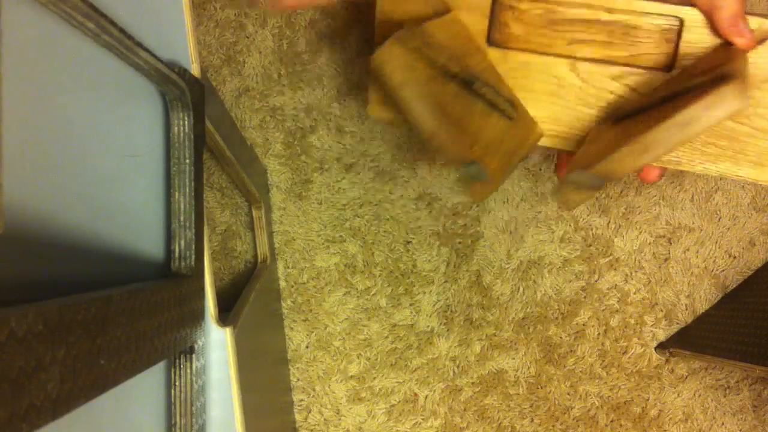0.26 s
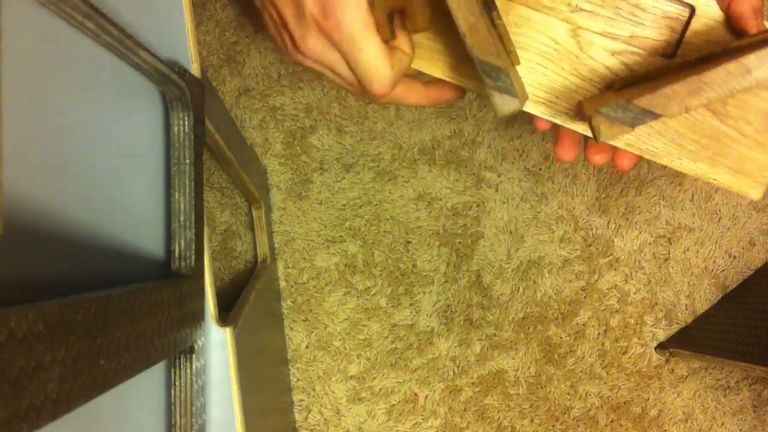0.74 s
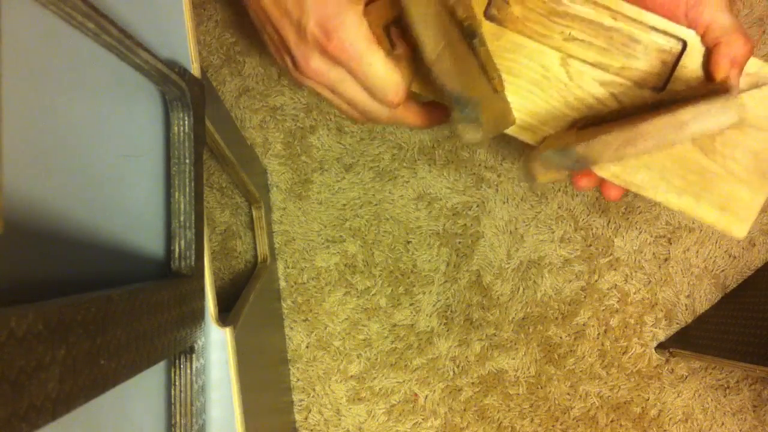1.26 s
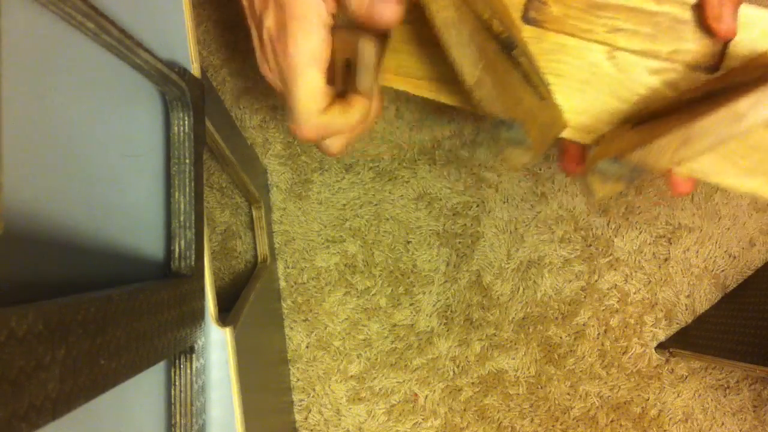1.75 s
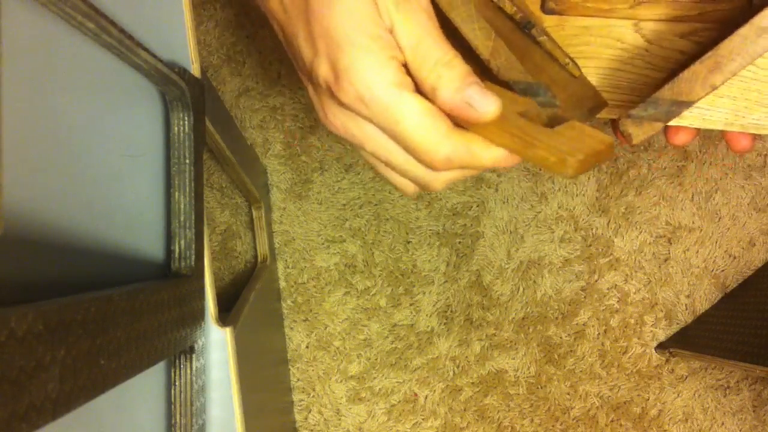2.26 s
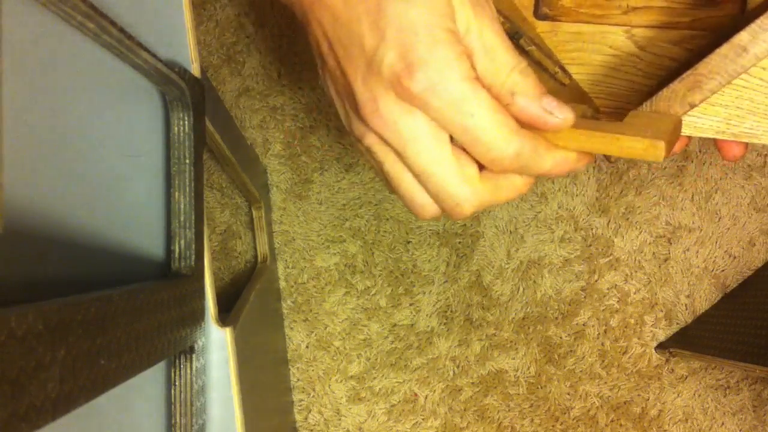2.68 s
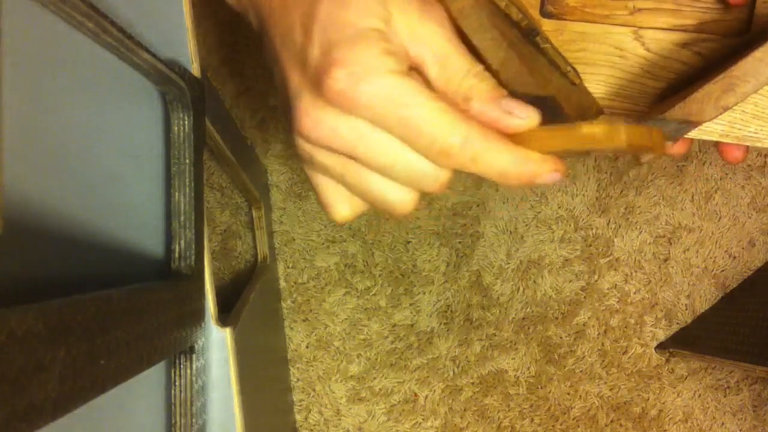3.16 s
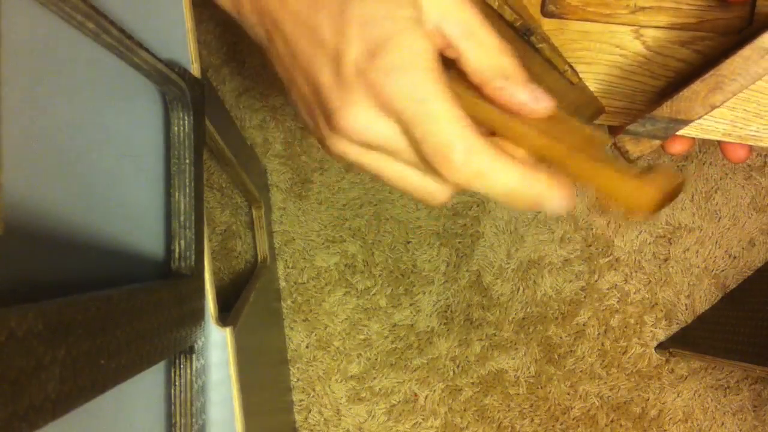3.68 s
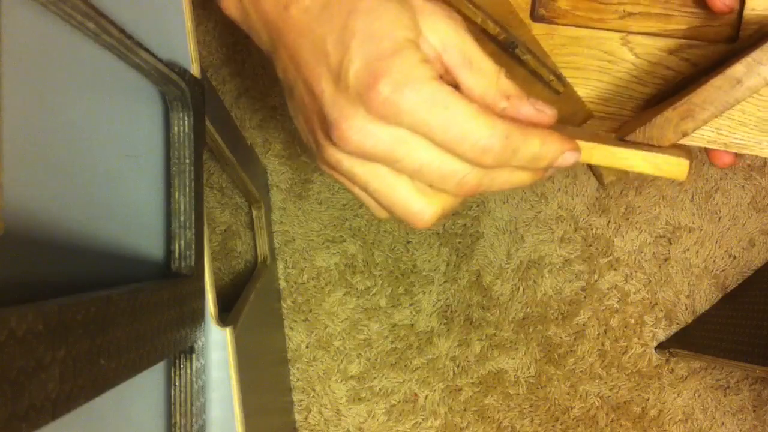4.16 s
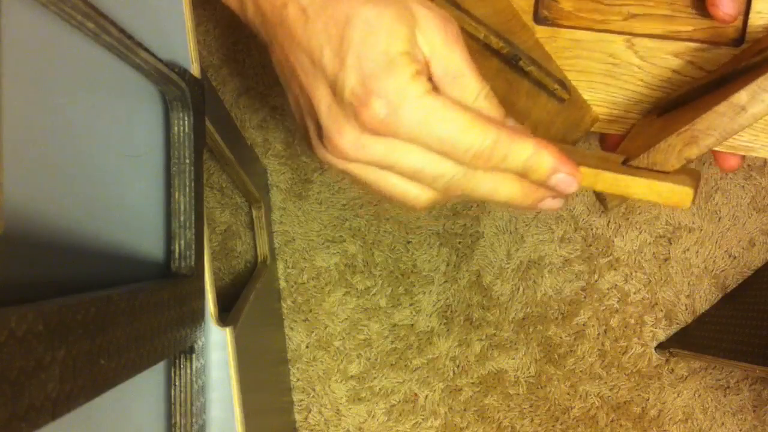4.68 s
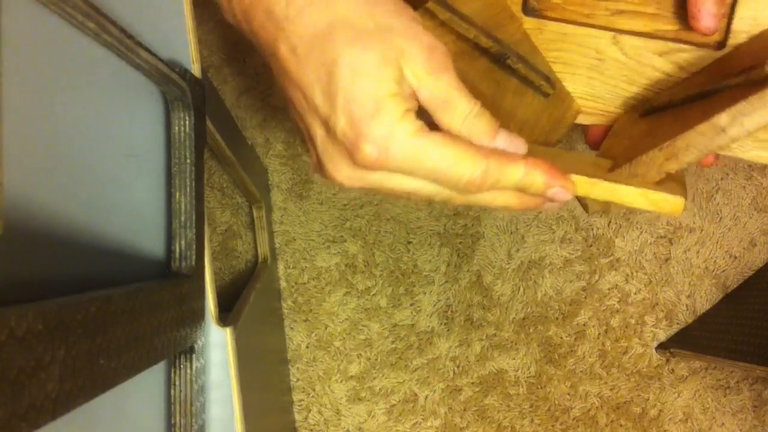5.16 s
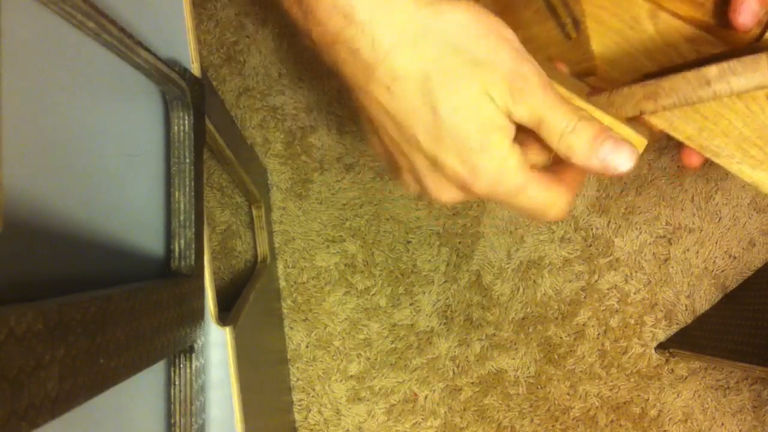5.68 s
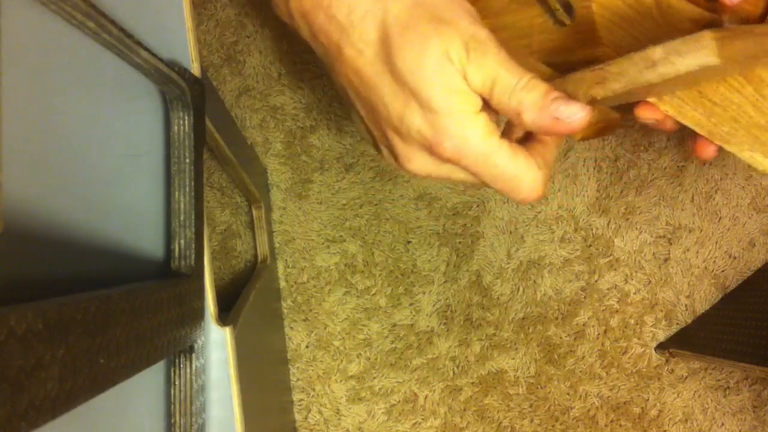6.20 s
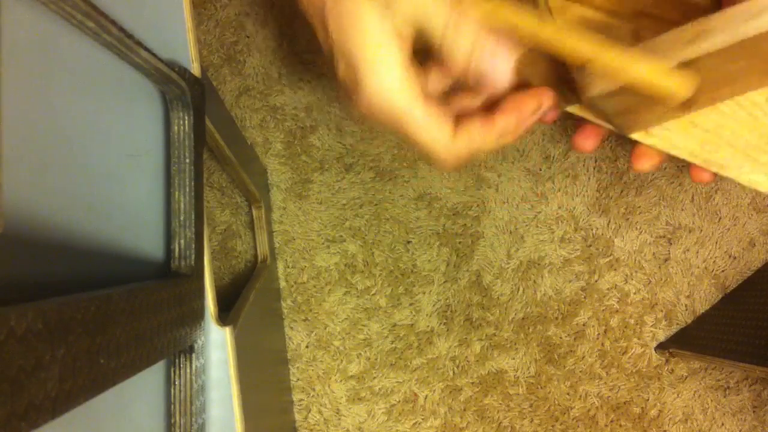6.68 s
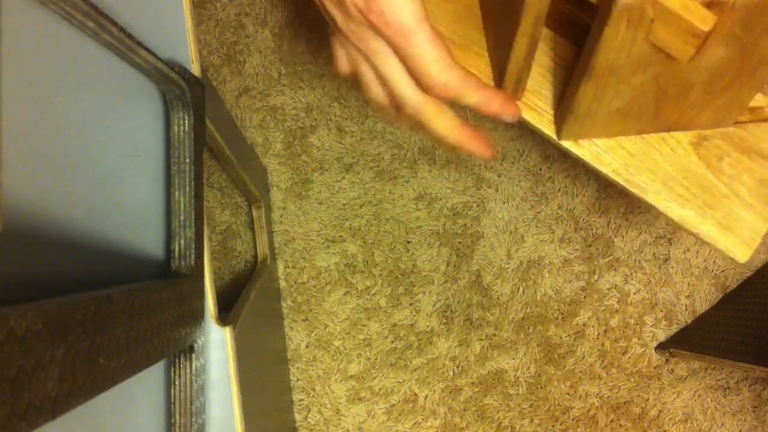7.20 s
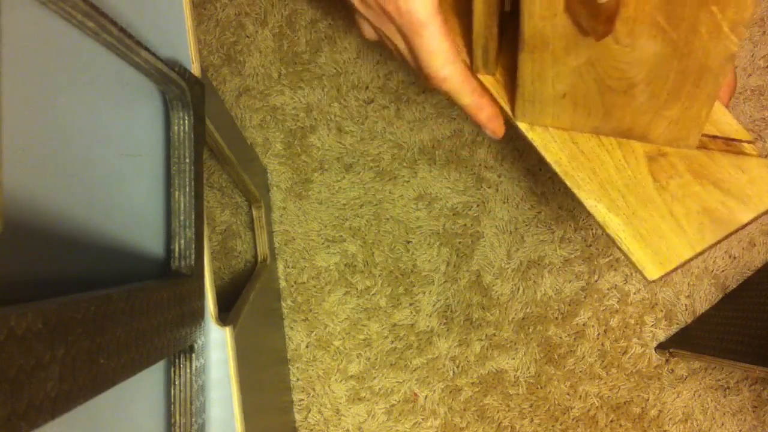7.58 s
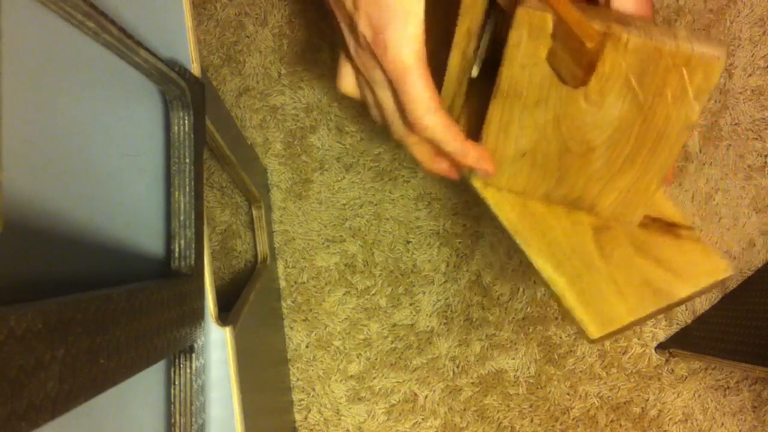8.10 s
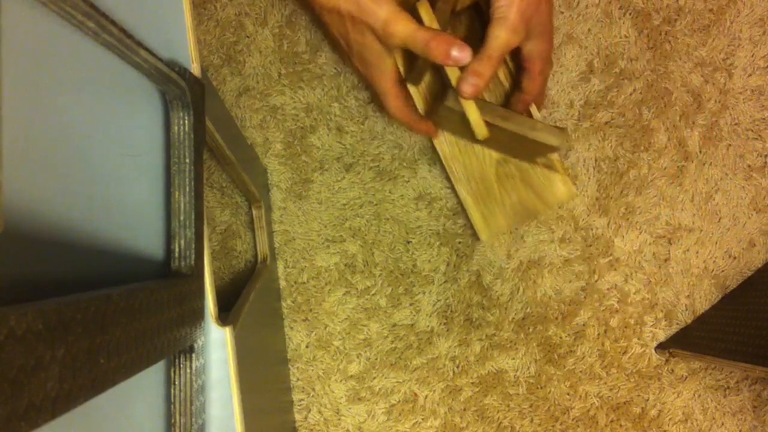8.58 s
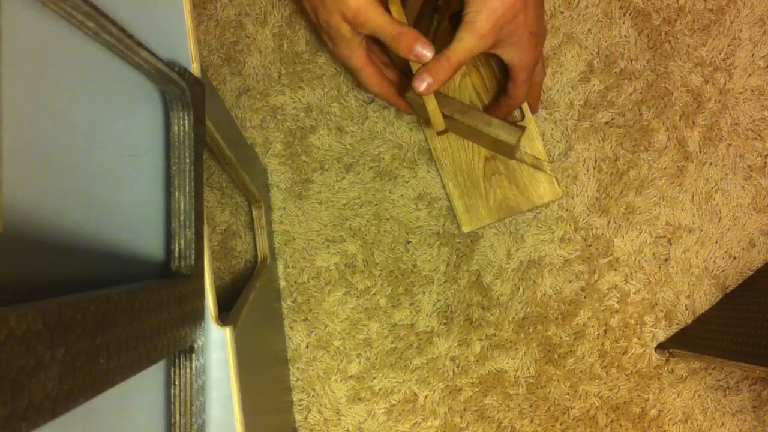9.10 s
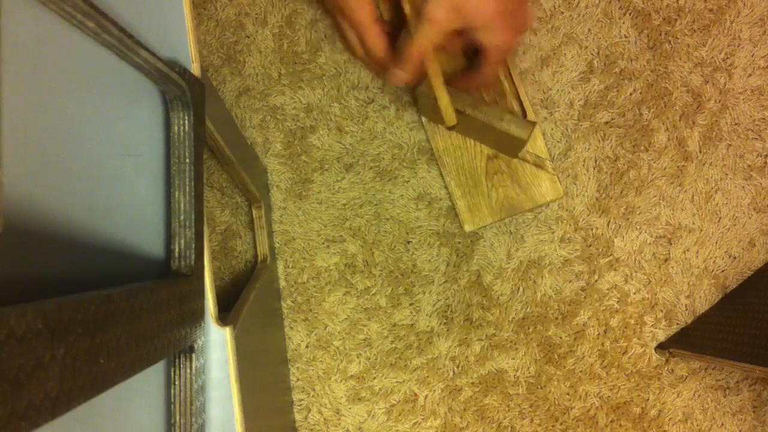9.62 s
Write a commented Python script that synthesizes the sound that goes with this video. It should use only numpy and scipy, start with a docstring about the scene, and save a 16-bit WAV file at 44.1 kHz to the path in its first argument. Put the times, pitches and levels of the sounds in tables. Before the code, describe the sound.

Slotted wooden pieces are fitted together by hand, heard close in a small carpeted room. A busy cluster of knocks opens, with a very loud clack after one second; more clacks follow around four, five and six seconds, then mostly soft rubbing, and a last firm knock past nine seconds. Short room tail, faint hiss.

```python
"""Wooden knocks and soft rubbing: slotted boards are fitted together by hand, close by, in a small carpeted room.
Each knock rings a few heavily damped modes of one piece, with a crack of the edges and a low push of the stack.
Dull bumps and low ringing come from soft pushes into one low resonance; rubbing strokes are many tiny slips that
ring the boards and hiss. The room answers with scattered echoes and a short tail, over faint air and hiss."""
import sys
import numpy as np
from scipy import signal
from scipy.fft import rfft, irfft
from scipy.io import wavfile

SR = 44100
rng = np.random.default_rng(int(sys.argv[2]) if len(sys.argv) > 2 else 0)


def store_wav(level_fs):
    """Save 16-bit WAV to argv[1]."""
    pcm = np.round(np.clip(np.atleast_2d(level_fs), -1, 1) * 32767)
    wavfile.write(sys.argv[1], SR, pcm.T.astype(np.int16))


N = 434385  # length of the scene in samples
SIZE = 8192  # length of one ring or impulse response in samples
HZ = np.fft.rfftfreq(SIZE, 1 / SR) + 1e-3  # frequencies of its spectrum, kept off zero for safe division


def amp(db):
    """Turns decibels into a gain."""
    return 10 ** (np.asarray(db) / 20)


def unit(x):
    """Scales a sound to energy 1 (its squared samples add up to 1)."""
    return x / np.sqrt(np.sum(x ** 2) + 1e-20)


def read(points, hz):
    """Reads a curve between its points, along a logarithmic frequency axis."""
    f, value = np.transpose(points)
    return np.interp(np.log(hz + 1), np.log(f + 1), value)


def add(mix, s, sound):
    """Mixes a sound in at time s in seconds."""
    start = max(round(s * SR), 0)
    part = mix[start:][:len(sound)]
    part += sound[:len(part)]


def causal(points):
    """Makes an impulse response of energy 1 with this spectrum and the sharpest possible start."""
    hz = abs(np.fft.fftfreq(SIZE, 1 / SR))
    log_gain = np.log(amp(read(points, hz)))
    # the Hilbert transform finds the phase that packs the energy as early as possible
    spectrum = np.exp(np.conj(signal.hilbert(log_gain)))
    return unit(np.fft.ifft(spectrum).real)


def colour(x, response):
    """Passes x through an impulse response and keeps its length."""
    return signal.oaconvolve(x, response)[:len(x)]


def knocks(bump_room_db=-11, lead_s=.0006):
    """Places every knock and bump, each with its own slightly different room; contact leads the main swing."""
    # Knocks. Each row: time of the main swing in seconds, name of the piece, level of its ring in dB,
    # contact cut-off in Hz, grip as a factor on the pitch, crack in dB relative to the ring.
    knock_list = [ (0.034, "slat", -4.5, 1200, 0.96, -17), (0.122, "slat", -1.5, 7000, 1.01, -23),
                  (0.400, "slat", -33.5, 2990, 0.92, -8), (0.533, "slat", -24, 1900, 0.89, -3.5),
                  (0.661, "bar", -6, 2610, 0.96, -14.5), (0.6834, "back", -10.5, 890, 1.21, -22),
                  (0.731, "base", -14, 3000, 0.92, -14), (1.036, "slat", -9.5, 1970, 0.93, -17.5),
                  (1.141, "back", -31, 890, 1.17, -20), (1.265, "base", -6.5, 3000, 0.98, -2.5),
                  (1.2745, "base", 16.5, 6110, 1, -21), (1.690, "base", -32, 600, 0.85, -25),
                  (1.898, "side", -38, 1996, 1.13, -13.5), (2.616, "bar", -21.5, 898, 0.88, -29.5),
                  (2.748, "base", -26.5, 4020, 0.7, -19), (2.7683, "bar", -5, 1500, 1.014, -19.5),
                  (2.7714, "joint", -14, 1508, 1.26, -22.5), (3.068, "base", -34.5, 5000, 0.7, -16),
                  (3.100, "joint", -37, 4000, 1.08, -1.5), (3.884, "side", -10, 5830, 1.04, -29.5),
                  (4.035, "strip", -4.5, 7000, 1.023, -23), (4.157, "joint", -17, 3040, 0.7, -14),
                  (4.1745, "joint", -4, 5000, 0.99, -17), (4.183, "joint", -5, 3000, 0.858, -16.5),
                  (4.2013, "joint", 0.5, 5000, 1.039, -26), (4.465, "back", -25, 5030, 0.97, -3),
                  (5.019, "bar", 7, 5000, 1.002, -17), (5.5078, "slat", -36.5, 4850, 0.94, 2.5),
                  (5.5501, "back", -33.5, 2970, 0.9, -9.5), (5.96, "joint", -21, 2000, 1.01, -21),
                  (6.1233, "side", -9, 1500, 0.93, -21), (6.1265, "side", 14, 4980, 0.99, -24),
                  (6.3543, "back", -15, 7090, 1.17, -5.5), (6.847, "bar", -24, 2000, 0.99, -20),
                  (6.973, "slat", -34, 1974, 1.18, -5.5), (7.235, "bar", -30.5, 1490, 0.98, -6.5),
                  (9.256, "back", 6, 6530, 1.014, -14.5), ]
    # Dull bumps of the hand or the stack, and low ringing under some knocks. Each row: start in seconds,
    # level in dB, resonance in Hz, its width in Hz.
    bump_list = [(.735, -27, 327, 14), (5.206, -14.5, 175, 26), (5.218, -10.5, 517, 270),
                 (5.224, -15, 233, 60), (5.280, -22, 139.7, 53), (5.397, -32.5, 137, 50),
                 (9.260, -15, 381, 65), (9.264, -22, 245, 12)]
    # Push that each piece passes on to the whole stack: name of the piece, then dB relative to a 0 dB knock.
    push_levels = {"base": -25.5, "bar": -27.5, "side": -31, "back": -18.5, "slat": -33.5, "strip": -27,
                   "joint": -29.5}
    push_slope = -0.27  # dB per dB: the lighter the touch, the larger the share of the push beside the ring
    # room relative to the direct sound of a 0 dB knock; hard knocks stand out more from their tail
    room_db, room_slope = -4.5, -0.056  # dB, dB per dB of level
    out = np.zeros(N)
    for s, piece, db, contact_hz, grip, crack_db in knock_list:
        push_db = push_levels[piece] + push_slope * db
        blow = knock(piece, contact_hz, grip, crack_db, push_db)
        response = room(room_db + room_slope * db)
        add(out, s - lead_s, amp(db) * signal.fftconvolve(blow, response))
    for s, db, hz, width in bump_list:
        low_sound = bump(hz, width)
        add(out, s, amp(db) * signal.fftconvolve(low_sound, room(bump_room_db)))
    return out


def knock(piece, contact_hz, grip, crack_db, push_db, crack_s=0.0024, give_hz=7000):
    """The piece rings, its edge fibres crunch for a moment, and the stack is pushed as a whole."""
    # Bending modes under the name of each piece of wood. Each row: pitch in Hz, width in Hz
    # (both before the grip factor), level in dB.
    pieces = { "base": [(690, 120, -5.5), (802, 134.7, 0.5), (966, 290, -3), (1325, 150, 3.5),
              (1479, 13, -5), (1820, 290, -17.5), (2260, 250, -13), (2890, 280, -16), (3620, 500, -28.5),
              (4300, 600, -29)], "bar": [(330, 17, -30), (780, 150, -5), (1120, 154, -1.5),
              (1280, 185, 0.5), (1553, 140, 4.5), (2420, 220, -6.5), (2750, 260, -10), (3650, 150, -13),
              (5600, 360, -15)], "side": [(688, 60, -11.5), (1104, 210.7, -3.5), (1146, 140, 0),
              (1790, 202.5, -3), (2410, 125, -3.5), (2701, 242, -11), (3560, 136, -15.5),
              (3829, 480, -18.5), (5660, 620, -32)], "back": [(242, 12, -22), (426, 12, -12),
              (609.6, 83, -11.5), (920, 260, -4.5), (1230, 310, -1.5), (1430, 180, -3), (2320, 180, -5.5),
              (2940, 120, -15), (3446, 500, -17.5), (4795, 1000, -37.5)], "slat": [(697.5, 32, -8),
              (1030, 180, -12), (1469, 170, 0.5), (1900, 150, 0), (2310, 310, -4.5), (2886, 1100, -10),
              (3740, 140, -5.5), (4327, 950, -15.5)], "strip": [(742, 54, -6), (1110, 170, -8),
              (1434, 70, 0.5), (2460, 180, -4), (3030, 150, -12), (3450, 220, -12.5)],
              "joint": [(335, 67, -19.5), (740, 120, -4), (939, 66, 3.5), (1235, 83, 0.5), (1445, 85, 6.5),
              (1920, 300, -3.5), (2440, 170, -4), (3100, 190, -15.5), (3630, 260, -12.5)], }
    # Spectrum of the crunching edges. Each row: frequency in Hz, level in dB.
    crack_spectrum = [(500, -22.5), (2000, 2.5), (4500, -2.5), (7000, -7.5), (10000, -13), (16000, -21)]
    # Spectrum of the push of the whole stack. Each row: frequency in Hz, level in dB.
    push_spectrum = [(20, -4), (70, -12), (140, -1), (300, 0.5), (450, 3), (800, -18), (2000, -45)]
    t = np.arange(SIZE) / SR
    fibres_give = signal.butter(2, give_hz, fs=SR)  # soft fibres take off the top
    body = signal.lfilter(*fibres_give, ring(pieces[piece], contact_hz, grip))
    crunch = rng.standard_normal(SIZE) * np.sqrt(t) * np.exp(-t / crack_s)
    crack = unit(colour(crunch, causal(crack_spectrum)))
    return body + amp(crack_db) * crack + amp(push_db) * causal(push_spectrum)


def ring(modes, contact_hz, grip=1, sign=-1, travel_s=.001):
    """Modes of alternating sign let the swing build over a cycle; a soft contact dulls the upper ones."""
    body = 0
    for k, (f, width, db) in enumerate(modes):
        detune = HZ / (f * grip) - f * grip / HZ  # zero at the mode's gripped pitch
        body = body + sign ** k * amp(db) / (1 + 1j * f / width * detune)
    # bending waves: the treble arrives first, 1 kHz after travel_s
    lag = 4 * np.pi * travel_s * np.sqrt(HZ * 1000)
    contact = 1 + 1j * HZ / contact_hz
    return unit(irfft(body * np.exp(-1j * lag) / contact))


def bump(hz, width, press_s=0.0024, soft_hz=1100):
    """A soft, uneven push of a few milliseconds goes into one low resonance."""
    t = np.arange(SIZE) / SR
    press = rng.standard_normal(SIZE) * t * np.exp(-t / press_s)
    force = signal.lfilter(*signal.butter(2, soft_hz, fs=SR), press)
    return unit(colour(force, ring([(hz, width, 0)], soft_hz)))


def rubbing(room_db=-10):
    """The boards slide in their slots in short strokes, heard through one shared room response."""
    # Each row: start in seconds, length in seconds, level in dB, hiss in dB relative to the ring of the boards,
    # pitch in Hz that the point of contact favours.
    stroke_list = [ (0, 0.3, -54, -8.5, 1510), (0.252, .2, -70, 0, 1570), (0.701, 0.22, -62, -2.5, 755),
                   (1.597, 0.26, -73, 2.5, 1176), (2.208, .08, -70, 8, 1570), (2.998, .12, -66, -4, 755),
                   (3.69, 0.037, -67, 15.5, 2310), (3.772, 0.056, -67.5, 14.5, 2324),
                   (4.418, 0.12, -58.5, -2.5, 757), (5.347, 0.087, -56, -2.5, 1183),
                   (5.499, 0.22, -66.5, 1, 1570), (6.59, 0.089, -62.5, 4, 1185),
                   (6.689, 0.18, -67, 0.5, 2315), (6.83, 0.26, -64, -4, 1590),
                   (7.07, 0.08, -63.5, -7.5, 755), (7.189, 0.12, -60.5, -7, 1185),
                   (7.448, 0.21, -63.5, -4, 1160), (7.752, 0.084, -64.5, 4, 2316),
                   (7.906, 0.12, -56.5, -1, 1570), (7.96, .19, -56, -3.5, 760),
                   (8.119, 0.16, -58, -4, 1570), (8.73, 0.1, -62, -1.5, 1184),
                   (8.829, 0.26, -66.5, -2.5, 1185), (9.111, 0.13, -60.5, -12, 1187),
                   (9.562, 0.14, -63.5, -3, 1570), (9.753, 0.081, -56, 0, 1226), ]
    strokes = np.zeros(N)
    for s, length, db, hiss_db, favoured_hz in stroke_list:
        add(strokes, s, amp(db) * stroke(length, hiss_db, favoured_hz))
    return colour(strokes, room(room_db))


def stroke(length, hiss_db, favoured_hz, slips_per_s=2500, spread_db=3, stutter_db=2.23, stutter_hz=35,
           contact_hz=4000, grip_spread=0.019):
    """Tiny slips of grain on grain ring the boards and hiss; the point of contact favours nearby modes."""
    # Modes of the boards pressed together. Each row: pitch in Hz, width in Hz (both before a small random
    # grip factor), level in dB before the lift near the favoured pitch and the step down from mode to mode.
    rub_modes = [(752, 34, -3.5), (1185, 18, 0), (1562, 130, -1.5), (2320, 165, -2.5), (3132, 200, -11),
                 (3974, 129, -1), (4270, 68, -38), (4940, 156, -13)]
    # Spectrum of the hiss of the grain. Each row: frequency in Hz, level in dB.
    hiss_spectrum = [(1500, -14.5), (3000, 0.5), (4500, -0.5), (8000, -3), (13000, -6.5), (16000, -4)]
    attack_s, release_s = 0.041, 0.059  # the hand leans in, holds if there is time, and eases off
    favour_db, favour_octaves = 4.5, 0.28  # lift of the modes near the favoured pitch, and its reach
    t = np.arange(round(length * SR) + SIZE) / SR
    pressure = np.clip(np.minimum(t / attack_s, (length - t) / release_s), 0, 1)

    # one second of slips of uneven strength, at random moments
    slips = rng.standard_normal(SR) * amp(spread_db * np.minimum(rng.exponential(1, SR), 4))
    # the wood catches and lets go: the level wanders between random points
    stutter = np.interp(np.arange(SR) / SR * stutter_hz, np.arange(SIZE), rng.standard_normal(SIZE))
    happens = rng.random(SR) < slips_per_s / SR
    slips = unit(slips * amp(stutter_db * stutter) * happens) * np.sqrt(SR)

    modes = []
    for hz, width, db in rub_modes:
        octaves_away = np.log2(hz / favoured_hz)
        lift_db = favour_db * np.exp(-(octaves_away / favour_octaves) ** 2)
        modes.append((hz, width, db + lift_db))
    grip = 1 + grip_spread * rng.standard_normal()
    # modes in step leave dark valleys between them; 0.81 is the extra gain step from each mode to the next
    boards = ring(modes, contact_hz, grip, sign=0.81)
    return colour(slips[:len(t)] * pressure, boards + amp(hiss_db) * causal(hiss_spectrum))


def room(wet_db, build_s=0.013, linger_db=-28, linger_t60=1.2, linger_hz=1250, linger_octaves=0.67,
         scatter_s=0.00045):
    """Direct sound, a few scattered echoes, a short diffuse tail and a faint lingering ring in the middle range."""
    # Time the tail takes to fall by 60 dB. Each row: frequency in Hz, time in seconds.
    fall_times = [(100, 0.24), (250, 0.53), (600, 0.3), (1300, 0.29), (2500, 0.46), (5000, 0.24),
                  (12000, 0.3)]
    # Spectrum of the tail before it decays. Each row: frequency in Hz, level in dB.
    tail_spectrum = [(40, -16), (90, -6.5), (200, 2.5), (400, 3), (800, 0.5), (1500, -3), (2500, -8),
                     (5000, 4), (14000, -5)]
    # Echoes of floor, walls and ceiling. Each row: longest delay in seconds (a random 2 to 6 % is taken off),
    # level in dB relative to the tail before its build-up.
    echoes = [(.0040, -3.5), (.0088, -11), (.0145, -13), (.0170, -11.5), (.0200, -8.5)]
    # noise is split into short frames, so that each frequency can decay at its own speed
    hz, t, z = signal.stft(rng.standard_normal(SR), SR, nperseg=256)
    hz = hz[:, None]
    quick = z * amp(read(tail_spectrum, hz) - 60 * t / read(fall_times, hz))
    octaves_away = np.log2((hz + 1) / linger_hz)
    slow = z * amp(-60 * t / linger_t60) / (1 + (octaves_away / linger_octaves) ** 4)
    quick, slow = signal.istft(np.array([quick, slow]), SR, nperseg=256)[1]
    t = np.arange(len(quick)) / SR
    build = 1 - np.exp(-(t / build_s) ** 2)
    response = (unit(quick) + amp(linger_db) * unit(slow)) * build
    for delay, db in echoes:  # furniture smears each echo, and its path shifts as the boards move
        smear = unit(rng.standard_normal(SIZE) * np.exp(-t[:SIZE] / scatter_s))
        add(response, delay * rng.uniform(.94, 0.98), amp(db) * smear)
    response *= amp(wet_db)
    response[0] += 1  # the direct sound
    return response


def background(level_db=-64.5):
    """Steady low air of the room and microphone hiss: shaped noise with an RMS level in dB re full scale."""
    # Spectrum of the noise. Each row: frequency in Hz, relative level in dB.
    noise_spectrum = [(25, -17.5), (52, -28.5), (80, -16), (125, -4.5), (220, 1.5), (320, -1.5),
                      (520, -4.5), (1000, -4.5), (2600, -8), (7400, -11.5), (10500, -14), (15800, -13.5)]
    gain = amp(read(noise_spectrum, np.fft.rfftfreq(N, 1 / SR)))
    noise = irfft(rfft(rng.standard_normal(N)) * gain, N)
    return amp(level_db) * unit(noise) * np.sqrt(N)


def scene():
    """Adds all sources at one microphone."""
    return (knocks() + rubbing() + background())[None]


def record(dry, edge_hz=15900):
    """Clips at full scale, then takes off everything above the band edge."""
    band_limit = signal.firwin(511, edge_hz, window=("kaiser", 9), fs=SR)
    return signal.oaconvolve(np.clip(dry, -1, 1), band_limit[None], "same")


dry = scene()
out = record(dry)
store_wav(out)
```